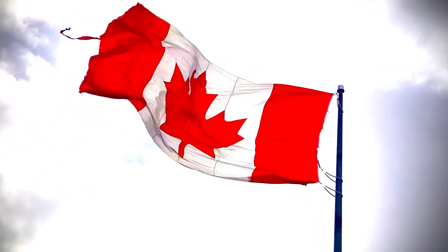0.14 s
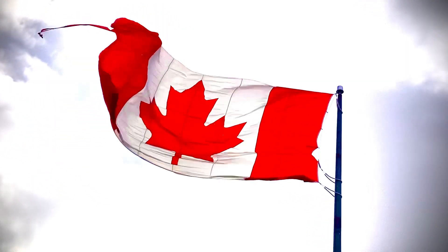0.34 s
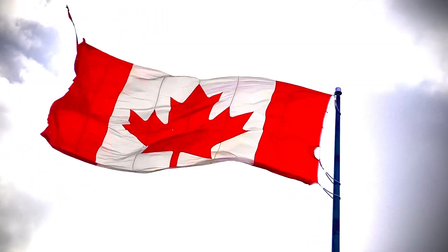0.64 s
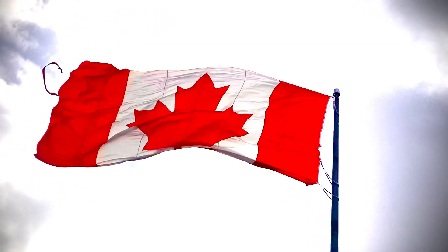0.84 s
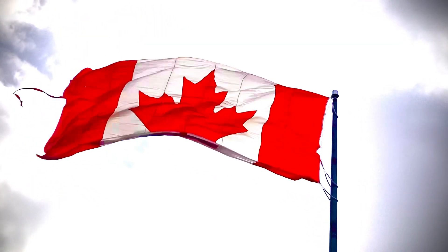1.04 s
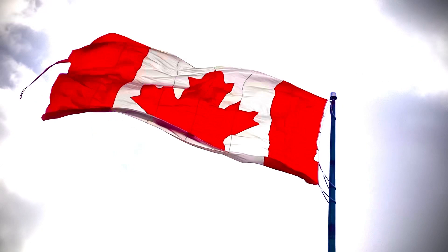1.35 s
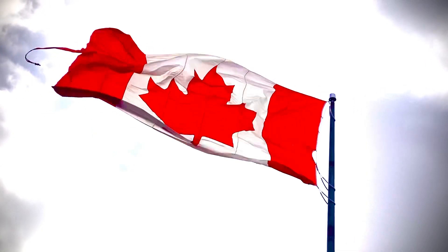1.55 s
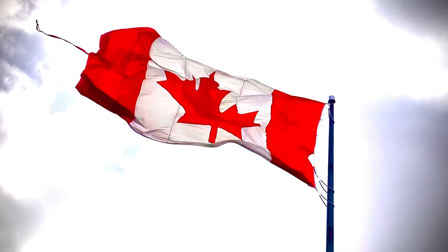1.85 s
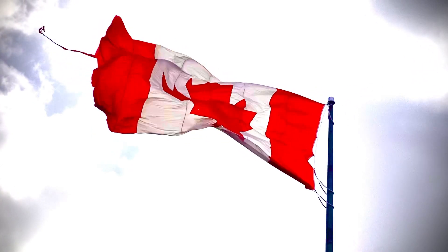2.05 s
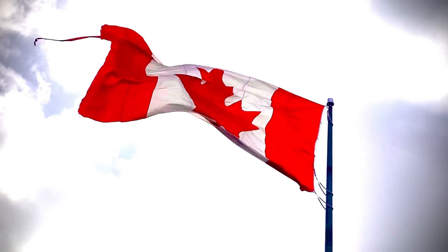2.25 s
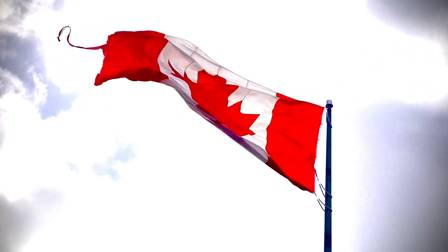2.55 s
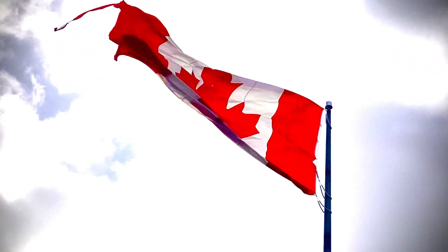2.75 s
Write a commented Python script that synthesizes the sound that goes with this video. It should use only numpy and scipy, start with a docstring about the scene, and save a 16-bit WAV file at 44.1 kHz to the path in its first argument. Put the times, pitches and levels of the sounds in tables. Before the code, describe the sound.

Wind buffets an outdoor microphone with deep rumble, spluttering gusts and soft hiss. It starts fairly weak with faint ticks, gusts at 0.4-0.8 seconds, dips around 0.85-1.15, then is strongest and most snappy at 1.2-1.9. It eases after 2; a tiny metallic ping at 2.27 and dry rigging clicks near 2.3 precede a heavy thump at 2.43. A lull follows, then a low punchy gust at 2.78 with a faint high whine.

```python
"""Wind buffets a microphone from the start, with a deep rumble and a soft hiss; a flag is flying from a pole.
Buffeting, rumble and hiss are coloured noise at two ports; the gusts also splutter in lumps. Hard eddies snap
as quick downward chirps, filtered pulses with late lows; the flag cracks once as a heavy thump. Cloth and
rigging tick as clicks with noise tails, and a metal fitting pings once as decaying sines. Sine waves add a
faint rising tone early on and a faint high whine near the end."""
import sys
import numpy as np
from scipy import signal
from scipy.fft import rfft, irfft, next_fast_len
from scipy.io import wavfile
from scipy.ndimage import uniform_filter1d

SR = 44100
rng = np.random.default_rng(int(sys.argv[2]) if len(sys.argv) > 2 else 0)


def dump_mix(stems):
    """Bounce the given channels to the path in sys.argv[1] as a 16-bit WAV at rate SR."""
    frames = np.atleast_2d(stems).T  # one column per channel
    limited = np.clip(frames, -1, 1)  # hard clip at full scale
    pcm = np.round(limited * 32767).astype(np.int16)
    wavfile.write(sys.argv[1], SR, pcm)


N = 127449
T = np.arange(N) / SR
SIZE = next_fast_len(N + SR // 4)  # padded, so late sound does not wrap round
HZ = np.maximum(np.arange(SIZE // 2 + 1) * SR / SIZE, 1)
PORT_SIGN = np.array([[1], [-1]])  # left, right


def from_db(db):
    """Decibels to gain."""
    return 10 ** (np.asarray(db) / 20)


def rms_one(x):
    """Scale to unit power."""
    return x / np.sqrt(np.mean(x ** 2) + 1e-20)


def in_time(rows):
    """Draw a breakpoint curve, sample by sample."""
    return np.interp(T, *np.transpose(rows))


def at_hz(rows, hz=HZ, axis=1):
    """Read a column of a table over log frequency."""
    rows = np.array(rows)
    return np.interp(np.log(hz), np.log(rows[:, 0]), rows[:, axis])


def filtered(x, response):
    """Apply a frequency response."""
    return irfft(rfft(x, SIZE) * response, SIZE)[..., :N]


def panned(db):
    """Left and right gains for a level difference, left minus right."""
    return from_db(0.5 * PORT_SIGN * db)


def port_phase(lead):
    """Phase response of the two ports when the left leads by the given angles."""
    return np.exp(0.5j * PORT_SIGN * at_hz(lead))


def drift(rate_hz):
    """Smooth random wander of unit rms, rolled off above the rate."""
    return rms_one(filtered(rng.standard_normal(SIZE), 1 / (1 + (HZ / rate_hz) ** 2)))


def click(s):
    """A unit impulse."""
    return 1.0 * (np.arange(N) == int(s * SR))


def chirp(cycles):
    """Response in which each pitch arrives about this many of its own cycles late, so lows follow highs."""
    return np.exp(-2j * np.pi * cycles * np.log(HZ + 20))


# how alike the air is at the two ports: f/Hz, correlation
PORT_LIKENESS = [(60, 0.91), (180, 0.68), (300, 0.86), (600, 0.83), (1200, 1), (2200, 1), (3500, 0.95),
                 (6500, 1), (7600, 0.84), (10000, .67)]
# stereo balance of the air: f/Hz, left-minus-right level/dB
PORT_TILT = [(60, 0.2), (300, -0.1), (700, 0.5), (1200, 3), (1700, 2), (2600, -0.3), (5000, -0.5)]


def air(lead):
    """White noise of about 0 dB per Hz at two ports: a shared part, and a part of opposite sign."""
    mid, side = rng.standard_normal((2, SIZE)) * np.sqrt(SR / 4)
    alike = np.clip(at_hz(PORT_LIKENESS), 0, 1)
    ports = panned(at_hz(PORT_TILT)) * port_phase(lead)
    shared = filtered(mid, np.sqrt(1 + alike) * ports)
    opposed = PORT_SIGN * filtered(side, np.sqrt(1 - alike) * ports)
    return shared + opposed


# phase lead of the left port in the wind: f/Hz, lead/rad
WIND_LEAD = [(60, 0.02), (300, -0.1), (600, -0.77), (1120, -1.12), (2000, -1.32)]
# strength of the gusts, heard relative to USUAL_GUST_DB: t/s, level/dB
GUST = [(0.0, -29), (0.045, -30), (0.07, -27), (0.17, -42.5), (0.285, -34), (0.305, -24), (0.36, -32),
        (0.4, -28.5), (0.42, -22), (0.465, -20.5), (0.5, -24.5), (0.52, -22), (0.56, -23), (0.615, -28),
        (0.645, -29.5), (0.67, -19), (0.81, -23), (0.84, -51), (0.86, -30.5), (0.91, -33.5), (0.935, -27),
        (0.97, -28.5), (1.17, -33.5), (1.19, -21), (1.23, -19), (1.25, -29.5), (1.31, -23), (1.34, -36),
        (1.38, -33.5), (1.395, -17), (1.47, -31.5), (1.51, -16), (1.54, -24.5), (1.575, -15), (1.605, -24),
        (1.64, -16.5), (1.66, -24.5), (1.69, -21), (1.715, -21), (1.735, -26.5), (1.77, -25),
        (1.795, -20.5), (1.82, -25), (1.845, -21.5), (1.93, -22.5), (1.96, -27), (2.01, -25.5), (2.07, -28),
        (2.12, -23.5), (2.24, -40.5), (2.28, -34), (2.38, -34.5), (2.44, -24), (2.52, -35), (2.56, -36.5),
        (2.61, -34), (2.67, -40.5), (2.7, -30.5), (2.74, -43), (2.79, -21.5), (2.84, -25.5), (2.89, -28)]
# strength of the bright top, heard relative to USUAL_TOP_DB: t/s, level/dB
BRIGHT_TOP = [(0.0, -51), (0.06, -34.5), (0.14, -55), (0.39, -46), (0.45, -28.5), (0.49, -54), (0.52, -25),
              (0.55, -36), (0.59, -34), (0.6, -52.5), (0.73, -29), (0.73, -27), (0.79, -52.5), (0.9, -56),
              (0.97, -29), (1.0, -35), (1.15, -43), (1.21, -27.5), (1.28, -46), (1.305, -33), (1.36, -59),
              (1.39, -28), (1.48, -34.5), (1.5, -34.5), (1.54, -34), (1.57, -24), (1.6, -31), (1.64, -25),
              (1.66, -34.5), (1.69, -17), (1.73, -37.5), (1.75, -33), (1.76, -37), (1.79, -23), (1.82, -35),
              (1.87, -24.5), (1.9, -23.5), (1.96, -33.5), (2.0, -27.5), (2.03, -27.5), (2.08, -45),
              (2.11, -37.5), (2.2, -50.5), (2.33, -45.5), (2.46, -31.5), (2.598, -47.5), (2.606, -39.5),
              (2.712, -51.5), (2.806, -32.5), (2.83, -49), (2.89, -33.5)]
# colour in a usual gust: f/Hz, level/dB per Hz, dB gained per dB of gust, dB gained per dB of top
BUFFET_COLOUR = [(114, -58.5, 1.05, 0), (176, -51, 0.88, 0), (244, -53, 0.9, 0), (400, -56.5, 1.16, -0.3),
                 (698, -58, 0.63, .5), (954, -64, 0.15, 0.78), (1300, -75.5, 0.58, 1.59),
                 (1666, -87.5, 1, 0.88), (2600, -104, -0.5, 0.28)]
USUAL_GUST_DB, USUAL_TOP_DB = -28, -37
SPLUTTER_DB, SPLUTTER_HZ = 3, 111  # lumps shared by all bands
PATCHY_DB, PATCHY_HZ = 2.45, 16.5  # slower lumps, separate in each band
EDDY_LAG_CYCLES = 1.1


def buffeting():
    """Turbulence in spluttering lumps: gust and top curves set each band's level, and lows arrive late."""
    gust_db = in_time(GUST) - USUAL_GUST_DB
    top_db = in_time(BRIGHT_TOP) - USUAL_TOP_DB
    splutter_db = SPLUTTER_DB * drift(SPLUTTER_HZ)
    flow = air(WIND_LEAD)
    colour = from_db(at_hz(BUFFET_COLOUR))
    out = 0
    for hz in 110 * 2 ** (np.arange(8) * 2 / 3):  # overlapping bands, two thirds of an octave apart
        band = np.clip(1 - np.abs(np.log2(HZ / hz)) * 3 / 2, 0, 1)
        lumps = rms_one(from_db(splutter_db + PATCHY_DB * drift(PATCHY_HZ)))
        gust_gain_db = gust_db * at_hz(BUFFET_COLOUR, hz, axis=2)
        top_gain_db = top_db * at_hz(BUFFET_COLOUR, hz, axis=3)
        out = out + filtered(flow, band * colour) * lumps * from_db(gust_gain_db + top_gain_db)
    return filtered(out, chirp(EDDY_LAG_CYCLES))


# swell of the rumble, before RUMBLE_TRIM_DB: t/s, level/dB
RUMBLE = [(0.0, -29.5), (0.26, -34.5), (0.43, -26), (0.56, -25.5), (0.58, -35), (0.7, -20), (1.01, -36),
          (1.03, -25.5), (1.11, -38.5), (1.16, -22), (1.19, -27.5), (1.3, -20.5), (1.36, -34),
          (1.41, -17.5), (1.48, -34.5), (1.58, -22.5), (1.61, -33), (1.65, -18.5), (1.72, -18.5),
          (1.75, -28), (1.8, -15.5), (1.82, -42), (1.84, -21.5), (1.88, -27.5), (2.03, -20.5),
          (2.07, -33.5), (2.13, -19), (2.22, -32.5), (2.29, -21.5), (2.33, -29), (2.45, -21.5),
          (2.5, -27.5), (2.57, -21), (2.6, -29.5), (2.69, -36.5), (2.73, -30.5), (2.76, -28), (2.8, -14.5),
          (2.85, -44), (2.88, -18)]
# its colour, before levelling: f/Hz, relative level/dB
RUMBLE_COLOUR = [(10, -45), (20, -31), (28, -17), (42, -11.5), (66, -0.5), (90, -4.5), (120, -6.5),
                 (180, -19), (400, -28.5), (1000, -100)]
RUMBLE_TRIM_DB = 2.5


def rumble():
    """Large slow eddies: deep noise held to an even strength, then swelled by its level curve."""
    eddies = filtered(air(WIND_LEAD), from_db(at_hz(RUMBLE_COLOUR)))
    running_power = uniform_filter1d(np.mean(eddies ** 2, axis=0), size=SR // 16)
    even = eddies / np.sqrt(running_power)
    return even * from_db(RUMBLE_TRIM_DB + in_time(RUMBLE))


WAVER_HZ, WAVER_RATE_HZ = 9, 51  # rms width and rate of the pitch waver


def tone(hz, db):
    """A sine at a given rms level, its pitch wavering slightly at random."""
    wavering_hz = hz + WAVER_HZ * drift(WAVER_RATE_HZ)
    return np.sqrt(2) * from_db(db) * np.sin(2 * np.pi * np.cumsum(wavering_hz) / SR)


# a faint thin tone that rises: t/s, f/Hz, level/dB
RISING_TONE = [(0, 8200, -76), (0.151, 8560, -73), (.28, 8660, -76), (.38, 8850, -100)]


def rising_tone():
    """A thin sine gliding upward early on, then fading."""
    s, hz, db = np.transpose(RISING_TONE)
    return tone(np.interp(T, s, hz), np.interp(T, s, db))


# slow swell of the hiss, added to its colour: t/s, level/dB
HISS = [(0, 2), (.22, 0), (.35, -0.5), (1.3, -0.8), (2.0, -2), (2.89, -1)]
# its colour: f/Hz, level/dB per Hz
HISS_COLOUR = [(100, -101.5), (900, -76.5), (1500, -82.5), (2200, -87.5), (3200, -91.5), (5000, -98.5),
               (7600, -99), (8800, -104), (10800, -103), (12200, -110), (13500, -130)]
# phase lead of the left port in the hiss: f/Hz, lead/rad
HISS_LEAD = [(1000, 1.4), (2000, 0), (4000, 0.039), (6500, 0), (7700, 0.19), (8200, 1.5), (12000, 1.2)]


def hiss():
    """Soft air noise, made slightly grainy by a quick 1 dB wander in level."""
    grain_db = 1.0 * drift(80)
    return filtered(air(HISS_LEAD), from_db(at_hz(HISS_COLOUR))) * from_db(in_time(HISS) + grain_db)


# hard eddies: t/s, level/dB before colour and trim, thin below f/Hz, dull above f/Hz,
# left-minus-right level/dB
SNAPS = [(.0305, -23.5, 200, 1100, -2), (0.0581, -17.5, 400, 1150, 3), (0.0654, -18, 250, 750, 0),
         (0.2944, -19.5, 200, 1000, 3), (.327, -24, 600, 1300, 5), (0.4145, -14, 150, 900, 8),
         (0.444, -12.5, 150, 900, -1), (0.467, -14, 100, 700, 4), (0.509, -13, 100, 1200, 0),
         (0.5264, -12, 350, 1150, 6), (0.5688, -15.5, 400, 800, 0), (0.587, -18, 400, 800, 0),
         (.6303, -20.5, 100, 800, 3), (.668, -12, 80, 350, -0.5), (.690, -13.5, 150, 900, 2),
         (.706, -9.5, 70, 300, -1), (0.7339, -9.5, 200, 1000, 2), (0.7616, -14, 250, 1100, 3.5),
         (0.9181, -17, 100, 650, 4.5), (.9637, -14, 350, 1200, 3.5), (1.192, -16.5, 300, 1400, -1),
         (1.2105, -11.5, 350, 1500, 0), (1.2236, -9, 350, 900, 1.5), (1.3046, -16.5, 400, 900, 5),
         (1.389, -17, 200, 850, 1), (1.3963, -13.5, 100, 800, -2), (1.4076, -14, 50, 800, 0),
         (1.4527, -17, 300, 850, 2), (1.5049, -11.5, 120, 1000, 0.5), (1.568, -12.5, 250, 1100, 4),
         (1.614, -7, 400, 850, 1), (1.6281, -8, 250, 800, 0), (1.6403, -10, 300, 1100, 1),
         (1.649, -6, 70, 240, 0), (1.6833, -7.5, 70, 550, 0), (1.6936, -14.5, 450, 1100, 1),
         (1.7493, -11, 350, 850, -2), (1.784, -8, 70, 330, 1), (1.789, -14, 250, 1150, 1.5),
         (1.8004, -16, 350, 1100, 0), (1.88, -3, 650, 1250, 2.5), (1.931, -14, 70, 644, 0),
         (1.9951, -19.5, 600, 1500, 1), (2.0091, -18, 250, 1000, 0.5), (2.017, -12, 50, 330, -0.5),
         (2.1047, -22, 200, 1600, 2), (2.111, -18.5, 200, 1500, 1), (2.139, -18.5, 120, 850, -0.5),
         (2.35, -16, 150, 1100, 2), (2.5135, -20, 700, 1000, -5), (2.764, -18, 120, 400, 0),
         (2.7785, -3, 120, 290, 1.5), (2.7925, -13.5, 150, 650, -5), (2.8107, -13.5, 400, 750, -3),
         (2.8642, -13.5, 250, 900, 2)]
# colour they share: f/Hz, relative level/dB
SNAP_COLOUR = [(30, -14), (100, -2), (250, -1.5), (500, -3), (900, -7.5), (1250, -12.5), (1500, -15.5),
               (2600, -35), (8000, -56)]
SNAP_TRIM_DB = 36.5


def snaps():
    """Single pressure pulses of hard eddies, falling quickly in pitch because their lows arrive late."""
    pulses = 0
    for s, db, low_hz, high_hz, pan_db in SNAPS:
        band = 1 / np.sqrt((1 + (low_hz / HZ) ** 4) * (1 + (HZ / high_hz) ** 6))
        placed = np.exp(-2j * np.pi * HZ * s)  # a pulse delayed to its moment
        pulses = pulses + placed * from_db(db) * band * panned(pan_db)
    colour = from_db(SNAP_TRIM_DB + at_hz(SNAP_COLOUR))
    return irfft(pulses * port_phase(WIND_LEAD) * chirp(EDDY_LAG_CYCLES) * colour, SIZE)[:, :N]


# contacts of cloth and rigging: t/s, level/dB before colour and trim, left-minus-right level/dB,
# dull above f/Hz, rustle t60/s
TICKS = [(0.064, -34.5, 0, 5000, 0.054), (0.119, -34, 1, 6000, 0.044), (.163, -37.5, 0, 12000, 0.011),
         (0.215, -38, 0, 6000, 0.074), (0.221, -34.5, -1, 11000, 0.018), (0.509, -38, 5, 12000, .008),
         (.671, -40.5, 0, 12000, .03), (1.178, -23, 0, 2000, 0.034), (1.229, -24, 1, 1990, .015),
         (1.508, -20.5, 0.5, 1950, 0.12), (1.6903, -22, 2, 2000, .015), (1.818, -32, 1, 2300, 0.012),
         (1.835, -20.5, 0, 1800, 0.032), (2.106, -27.5, 2, 2600, .06), (2.298, -32, 1, 14000, .008),
         (2.3005, -32, -5, 14000, 0.0087), (2.3156, -19, 5, 8800, 0.012), (2.3233, -33, -7, 12000, .012),
         (2.33, -36, 6, 8000, 0.013), (2.4582, -33.5, -2, 10000, 0.0092), (2.4662, -37.5, 4, 14000, 0.017),
         (2.759, -39, -2, 12000, 0.0092), (2.782, -41, 2, 14000, 0.013)]
# colour they share: f/Hz, relative level/dB
TICK_COLOUR = [(200, -28), (1200, 15.5), (3500, 10), (7500, 6.5), (9300, 1), (11500, 0), (14000, -25)]
TICK_TRIM_DB, TICK_TAIL_DB = 4, -22  # the tail is relative to the click
TICK_UNEVEN_DB = 3.5  # spread of each contact's own colour


def ticks():
    """Dry clicks, each with its own uneven colour and a brief noise rustle after it; duller ones are cloth."""
    out = 0
    knots = np.linspace(0, SR / 2, 24)
    for s, db, pan_db, dull_hz, t60 in TICKS:
        decay_db = -60 * np.minimum(np.abs(T - s) / t60, 2)
        rustle = rng.standard_normal(N) * (T > s) * from_db(TICK_TAIL_DB + decay_db)
        lowpass = signal.butter(4, min(dull_hz, 0.45 * SR), fs=SR)
        contact = signal.lfilter(*lowpass, click(s) + rustle + 1e-18)
        colour = from_db(TICK_UNEVEN_DB * np.interp(HZ, knots, rng.standard_normal(len(knots))))
        out = out + filtered(contact, colour) * from_db(db) * panned(pan_db)
    return filtered(out, from_db(TICK_TRIM_DB + at_hz(TICK_COLOUR)))


# a faint high whine: t/s, level/dB
WHINE = [(2.1, -95), (2.33, -76), (2.37, -67), (2.42, -74), (2.59, -76), (2.625, -64), (2.725, -65.5),
         (2.755, -80), (2.785, -66), (2.815, -73), (2.845, -65), (2.89, -74)]
WHINE_HZ = 4490


def whine():
    """A sine near one high pitch that swells and fades late on."""
    return tone(WHINE_HZ, in_time(WHINE))


# ringing modes of a small metal fitting: f/Hz, starting peak level/dB, t60/s
FITTING = [(8200, -65, .1), (9750, -64, .07), (10950, -53, .11), (12100, -60, .05)]
FITTING_S = 2.265


def fitting():
    """One thin metallic ping: high sines that start together, each decaying at its own rate."""
    age = np.maximum(T - FITTING_S, 0)
    ping = 0
    for hz, db, t60 in FITTING:
        ping = ping + from_db(db - 60 * age / t60) * np.sin(2 * np.pi * hz * age)
    return ping


# colour of the thump, deep with a thin crack on top: f/Hz, relative level/dB
THUMP_COLOUR = [(30, -21.5), (65, -12), (115, -1), (180, -3), (310, 0), (490, -4.5), (570, -19.5),
                (690, -31), (820, -13.5), (1250, -19), (1480, -27.5), (2900, -37.5), (3600, -56),
                (8000, -82)]
# its stereo balance: f/Hz, left-minus-right level/dB
THUMP_TILT = [(100, 3), (490, 2.5), (740, 8), (1130, 4.5), (1700, 1)]
THUMP_S, THUMP_TRIM_DB, THUMP_LAG_CYCLES = 2.4342, 39, 1.6


def thump():
    """A heavy blow: one impulse whose lows lag, so a crack drops at once into a compact low punch."""
    colour = from_db(THUMP_TRIM_DB + at_hz(THUMP_COLOUR))
    return filtered(click(THUMP_S), colour * chirp(THUMP_LAG_CYCLES) * panned(at_hz(THUMP_TILT)))


def scene():
    """Wind on the microphone over the small sounds of the flag."""
    wind = buffeting() + rumble() + hiss() + snaps() + thump()
    flag = ticks() + fitting()
    return wind + flag + rising_tone() + whine()


LOW_CUT_HZ, HIGH_CUT_HZ = 25, 12600


def record(dry):
    """A steep cut of the deepest lows at the microphone, then a steep cut of the top."""
    low_cut = filtered(dry, 1 / np.sqrt(1 + (LOW_CUT_HZ / HZ) ** 8))
    high_cut = signal.ellip(10, 0.1, 70, HIGH_CUT_HZ, fs=SR, output="sos")
    return signal.sosfilt(high_cut, low_cut)


dry = scene()
out = record(dry)
dump_mix(out)
```